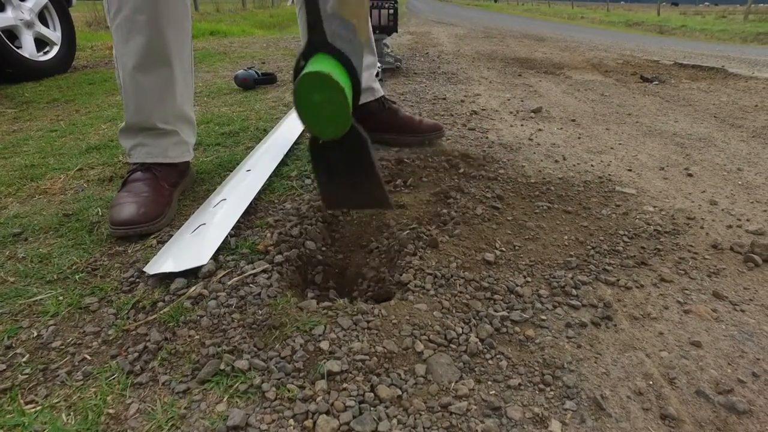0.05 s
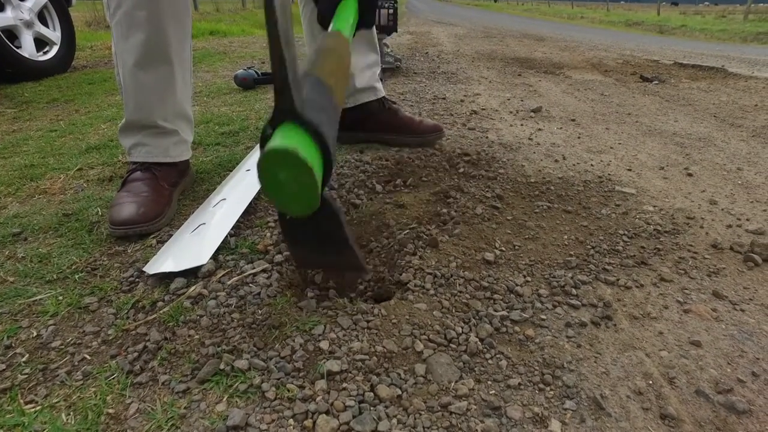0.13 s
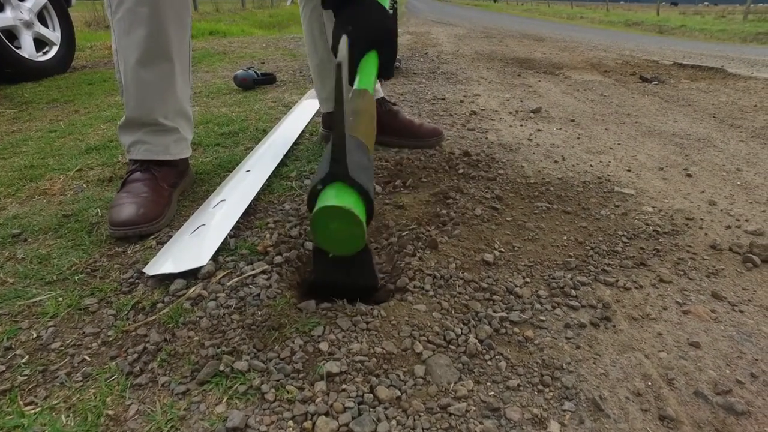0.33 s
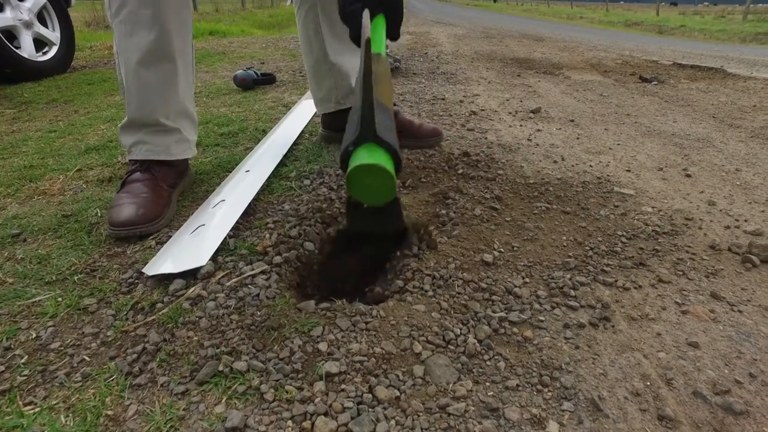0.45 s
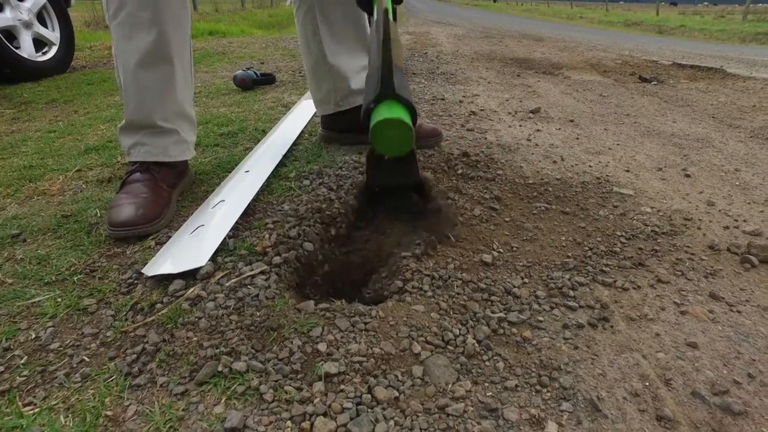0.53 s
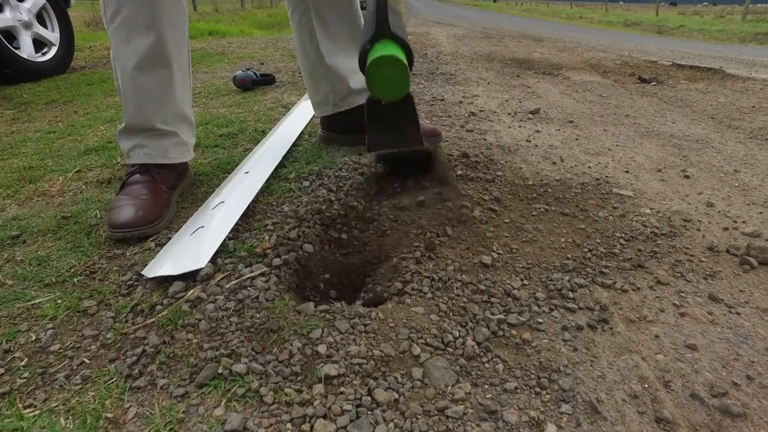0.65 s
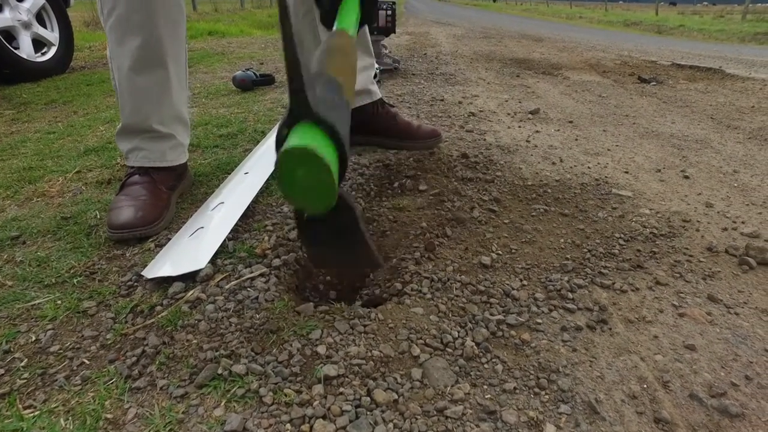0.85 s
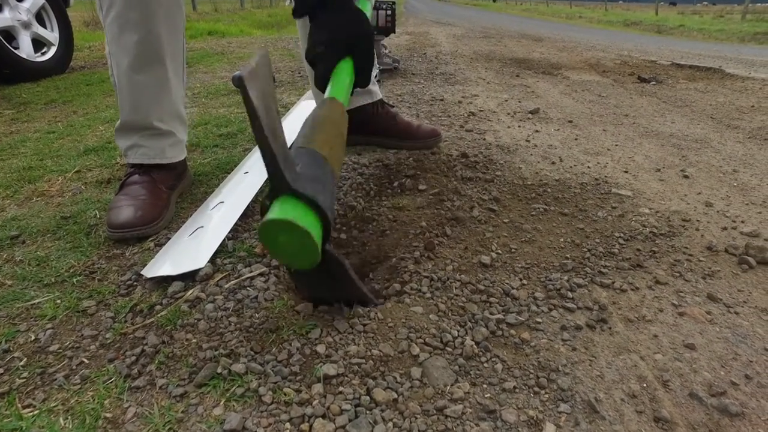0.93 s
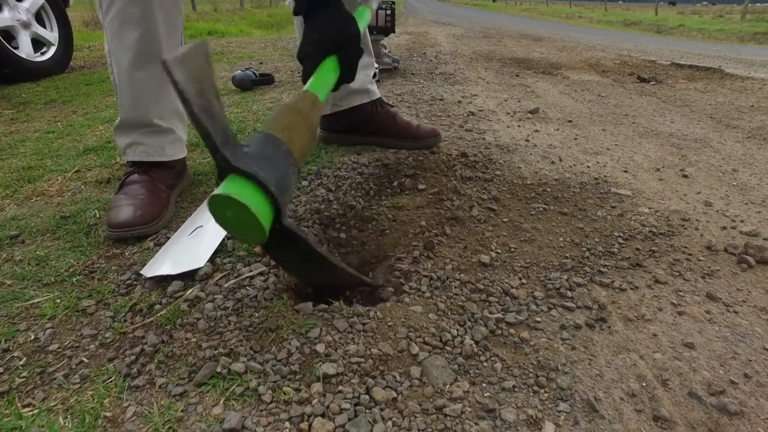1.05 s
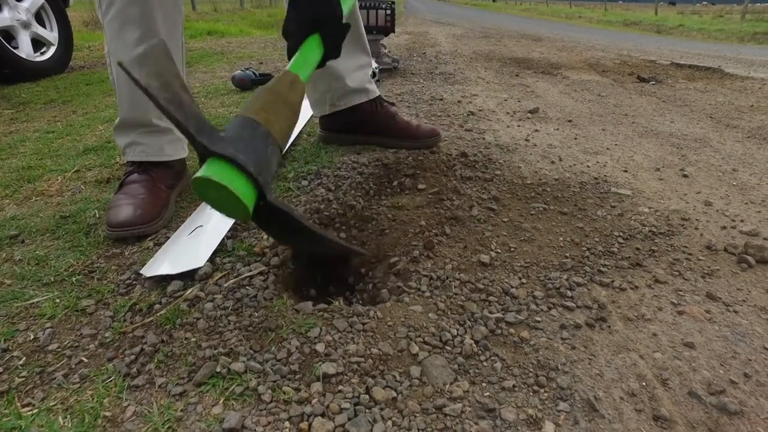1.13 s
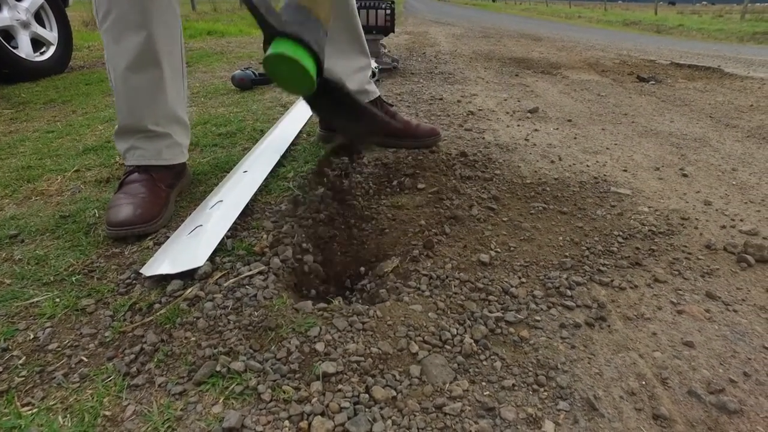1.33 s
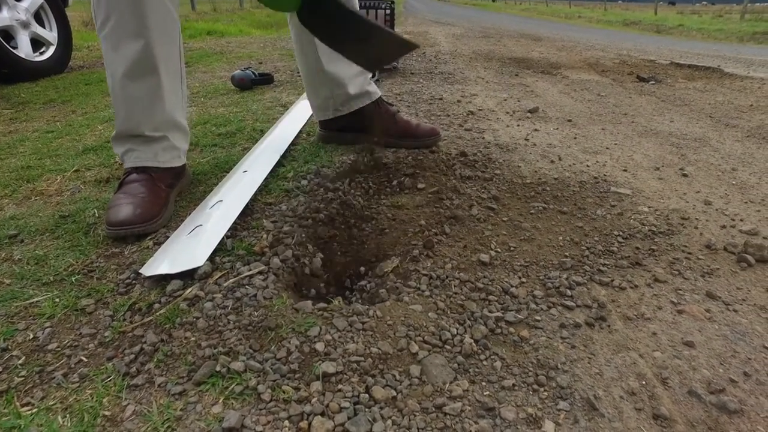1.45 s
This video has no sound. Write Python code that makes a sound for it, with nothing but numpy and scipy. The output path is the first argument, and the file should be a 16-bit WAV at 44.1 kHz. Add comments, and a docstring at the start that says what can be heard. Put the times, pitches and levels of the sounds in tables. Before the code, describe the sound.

A mattock chops into hard gravel close by, with a sharp crunch and thud at about 0.25 seconds. Stones grind and knock on the blade until 0.5, then grit patters down. A second, brighter chop lands at 0.95 seconds, followed by louder scraping and clacking. The steel rings briefly as it comes free around 1.1, and more grit falls until 1.5. Light wind rumbles on the microphone throughout.

```python
"""A sharp crunch of gravel, close by: a mattock (a heavy digging tool) chops twice into a hard roadside.
Each time the blade crushes in, thuds to a stop in packed earth and is levered out, so stones grind and
knock against the steel. The buried blade rings only briefly; it rings longer as it comes free at the end.
Thrown grit patters down after each blow, and light wind rumbles on the microphone."""
import sys
import numpy as np
from scipy import signal
from scipy.fft import rfft, irfft, next_fast_len
from scipy.io import wavfile
from scipy.ndimage import map_coordinates

SR = 44100
rng = np.random.default_rng(int(sys.argv[2]) if len(sys.argv) > 2 else 0)


def waveform_to_disk(signal):
    """Save audio, clipped to [-1, 1], as 16-bit WAV at the path in sys.argv[1]."""
    frames = np.transpose(np.atleast_2d(signal))
    scaled = np.clip(frames, -1, 1) * 32767
    samples = np.round(scaled).astype(np.int16)
    wavfile.write(sys.argv[1], SR, samples)


N = 66150

# Levels are relative. A fade_s is the time a sound takes to die away by 60 dB.
# The blade cutting in: start_s, hold_s, gravel_db, head_db, blade_db
BITES = [(0.2254, 0.025, -34, -34, -34.5), (0.9462, 0.0029, -22, -27.5, -19),
         (0.954, 0.0082, -32, -25, -78)]
# The blade packing the earth: start_s, hold_s, level_db
PACKS = [(.231, 0.018, -30), (0.2453, 0.0023, -19.5), (0.253, 0.0023, -32), (.958, 0.0127, -29)]
# The ground taking the weight: start_s, pitch_hz, level_db, fade_s
THUDS = [(.2468, 832, -3.5, 0.012), (.2472, 632, -15.5, 0.029), (.2478, 176, -18, 0.045),
         (.2515, 80.5, -21.5, 0.075), (.292, 160, -26.5, 0.031), (1.083, 217, -29, .04),
         (1.129, 95, -25, 0.082)]
# The steel edge glancing off a stone: start_s, pitch_hz, level_db, fade_s
CLINKS = [(.2366, 11900, -13.5, 0.003), (.2976, 1317, -26, 0.04), (.9472, 3700, -6.5, 0.014)]
# Grinding as the blade is levered out, one list for each pull: time_s, level_db
PULLS = [
    [(.262, -75), (.285, -51), (.325, -45), (.348, -52), (.39, -46.5), (.412, -41), (.432, -45),
     (.448, -55.5), (.48, -45), (.53, -59.5), (.56, -94)],
    [(.972, -43), (1.005, -71), (1.03, -38), (1.064, -58), (1.076, -36), (1.104, -41), (1.13, -37),
     (1.16, -41), (1.2, -36.5), (1.218, -72), (1.27, -61)],
]
# The tone of each pull: head_db, blade_db, treble_lift_db
PULL_TONES = [(-3.5, -10, -1), (-12, -5.5, 3)]
# Stones knocking on the blade: start_s, level_db, clunk_db, rough_pitch_hz
KNOCKS = [(0.2965, -37.5, -27.5, 2980), (0.316, -44, -35, 2490), (0.355, -43, -42.5, 9260),
          (0.377, -39, -50, 7860), (.413, -47.5, -51, 3500), (0.46, -52, -43, 2960),
          (0.4701, -42.5, -32, 2960), (1.021, -36, -40, 4160), (1.0325, -34.5, -38, 3580),
          (1.055, -42.5, -39.5, 4870), (1.077, -37, -34, 3620), (1.1172, -28.5, -34.5, 4220),
          (1.132, -30, -32, 4600), (1.14, -31, -51, 3900), (1.169, -32.5, -45, 4100), (1.2, -39, -39, 4040),
          (1.229, -37, -72, 3700)]
# Single bits of grit landing nearby: start_s, level_db
GRIT_TICKS = [(.5955, -38), (.630, -36), (.6505, -38), (.6585, -38), (.6975, -38), (.6992, -32),
              (.7212, -35), (.7487, -27), (.7635, -39), (.832, -41), (1.294, -42.5), (1.342, -35.5),
              (1.378, -35), (1.391, -33), (1.445, -40)]
# The shower of fine grit: time_s, level_db
GRIT_SHOWER = [(0, -50), (.1, -63), (.19, -68.5), (.5, -59.5), (.6, -61.5), (.655, -54), (.72, -63),
               (.77, -53.5), (.81, -66), (.9, -75), (1.26, -65), (1.35, -58), (1.42, -56), (1.45, -47.5),
               (1.5, -61)]
# Notes of the tool's head on its handle, when nothing muffles it: pitch_hz, level_db, fade_s
HEAD_NOTES = [(582, -8, 0.09), (900, 2, 0.063), (1246, 1, 0.08), (1850, -2.5, 0.032), (2124, -10.5, 0.11),
              (2420, -33, 0.12), (3070, -4, 0.062), (3138, 0, 0.093), (3320, -5.5, 0.059),
              (3270, -4, 0.037), (3930, -1.5, 0.089), (4720, -7.5, 0.016), (5955, 0.5, 0.037)]
# Notes of the free steel blade: pitch_hz, level_db, fade_s
BLADE_NOTES = [(2238, -2, .16), (3587, 1, .15), (4278, -3, .16), (4936, -7, .1), (5955, -7, .1),
               (6500, -2, .3), (6761, -6, .15), (8263, -4, .24), (8870, -3, .08), (9920, -10, .12),
               (11690, -14, .16), (12120, -8, .16), (13080, -13, .2), (13750, -12, .14), (14820, -13, .15)]
# The bright tone of crushed gravel: pitch_hz, level_db
CRUNCH_TONE = [(100, -10), (400, -2), (1000, -2.5), (2200, -1), (3800, 7), (6000, -1), (10000, -25),
               (14500, -46), (16000, -11)]
# The rough tone of gravel rubbing on steel: pitch_hz, level_db
GRIND_TONE = [(80, 7), (250, 2.5), (500, 5), (900, 2), (1600, -5.5), (2700, -0.5), (3700, 3), (5000, -8.5),
              (7500, -10), (10000, -33), (14500, -54), (16000, -61)]
# The dull tone of packed earth: pitch_hz, level_db
EARTH_TONE = [(50, -2), (180, -1.5), (450, -2), (800, -0.5), (1400, -4.5), (2400, -6), (5000, -26),
              (16000, -69)]
# The thin, high tone of falling grit: pitch_hz, level_db
GRIT_TONE = [(300, -24), (2200, -8.5), (5500, 2), (8500, -2.5), (11000, -3.5), (14500, -1.5), (16500, -1.5)]
# Wind rumble and outdoor hush: pitch_hz, level_db
WIND_TONE = [(12, 0.5), (30, 1.5), (60, -0.5), (110, -9), (200, -23), (450, -23), (1000, -30),
             (2200, -39.5), (3300, -35.5), (4300, -34), (5500, -49), (10000, -62), (16000, -65)]

FREE_AT_S, FREEING_S, FREE_BOOST_DB = 1.124, 0.0073, 6  # the blade leaves the earth
BURIED_FADE_SCALE = 0.15  # share of its ringing time that the buried blade keeps
CRUSH_SPREAD_DB, LOOSE_SPREAD_DB = 2, 4  # how much crushed and loose grains vary in strength


def chops():
    """The blade crushes gravel, rings briefly and is stopped by the earth."""
    bites = sum(amp(levels_db)[:, None] * burst(start_s, hold_s, fade_s=0.024, attack_s=0.0006)
                for start_s, hold_s, *levels_db in BITES)
    gravel_gain, head_gain, blade_gain = bites
    crunch = colour(gravel_gain * grains(14000, CRUSH_SPREAD_DB), CRUNCH_TONE)
    crush = grains(12000, CRUSH_SPREAD_DB)
    head = ring(head_gain * crush, HEAD_NOTES, fade_scale=0.7)
    blade = ring(blade_gain * crush, BLADE_NOTES, BURIED_FADE_SCALE)
    packing = sum(amp(db) * burst(start_s, hold_s, fade_s=0.015) for start_s, hold_s, db in PACKS)
    earth = colour(packing * grains(12000, CRUSH_SPREAD_DB), EARTH_TONE)
    thuds = pings(THUDS, attack_s=0.00084)
    clinks = pings(CLINKS, attack_s=0.00068)
    return crunch + head + blade + earth + thuds + clinks


def levering():
    """Gravel grinds along the steel as it is pulled out; once free, the blade rings on."""
    out = np.zeros(N)
    free = (1 + np.tanh((clock() - FREE_AT_S) / FREEING_S)) / 2  # 0 buried, 1 free
    for points, (head_db, blade_db, lift_db) in zip(PULLS, PULL_TONES):
        rub = level(points) * slips() * grains(3000, LOOSE_SPREAD_DB)
        grind = colour(rub, GRIND_TONE, lift_db)
        blade = ring(rub * (1 - free), BLADE_NOTES, BURIED_FADE_SCALE)
        blade += amp(FREE_BOOST_DB) * ring(rub * free, BLADE_NOTES)
        out += grind + amp(head_db) * ring(rub, HEAD_NOTES) + amp(blade_db) * blade
    return out


def slips(changes_per_s=130, spread_db=3.5):
    """Gravel catches and slips, so the grinding flickers in loudness."""
    steps = np.clip(rng.standard_normal(int(N * changes_per_s / SR) + 4), -2, 2)
    flicker = map_coordinates(steps, [clock() * changes_per_s])  # glide from step to step
    return unit(amp(spread_db * flicker))


def knocks():
    """Larger stones slip and knock against the steel, each with a short clack of its own."""
    hits, clunks, clacks = np.zeros((3, N))
    for start_s, level_db, clunk_db, rough_pitch_hz in KNOCKS:
        shape = burst(start_s, hold_s=0.0012, fade_s=0.024, attack_s=0.00017)
        hit = amp(level_db) * shape * grains(9700, CRUSH_SPREAD_DB)
        pitches_hz = rough_pitch_hz * np.exp(0.2 * rng.uniform(-2.05, 1.5, size=6))
        clacks += ring(hit, [(hz, 0, 0.028) for hz in pitches_hz])  # six equally strong, short notes
        hits += hit
        clunks += amp(clunk_db) * shape
    crunch = amp(-11) * colour(hits, CRUNCH_TONE)
    head = amp(-4) * ring(hits, HEAD_NOTES, fade_scale=0.6)
    blade = amp(-8) * ring(hits, BLADE_NOTES, BURIED_FADE_SCALE)
    earth = colour(clunks * grains(6000, LOOSE_SPREAD_DB), EARTH_TONE)
    return crunch + amp(-5) * clacks + head + blade + earth


def grit():
    """Thrown grit lands in a fine shower with single sharp ticks."""
    ticks = np.zeros(N)
    for start_s, level_db in GRIT_TICKS:
        snap = burst(start_s, hold_s=0.0002, fade_s=0.0025, attack_s=0.00005)
        tail = amp(-17) * burst(start_s, hold_s=0, fade_s=0.03)
        ticks += amp(level_db) * (snap + tail)
    coarse = grains(400, LOOSE_SPREAD_DB)
    fine = amp(-5) * grains(6000, LOOSE_SPREAD_DB)
    shower = level(GRIT_SHOWER) * (coarse + fine)
    return colour(ticks * rng.standard_normal(N) + shower, GRIT_TONE)


def ground_echo(sound):
    """The ground scatters back a weak, short echo."""
    echo_shape = burst(start_s=0.005, hold_s=0, fade_s=0.095)
    return amp(-21) * through(sound, rng.standard_normal(N) * echo_shape)


def wind():
    """Light wind rumbles on the microphone over a far outdoor hush."""
    return amp(-45.5) * unit(colour(rng.standard_normal(N), WIND_TONE))


def grains(per_s, spread_db):
    """Tiny clicks of uneven strength at random moments, like small stones touching."""
    sizes = amp(spread_db * np.clip(rng.standard_normal(N), -2, 2))
    signs = rng.choice([-1, 1], N)
    touching = rng.random(N) < per_s / SR
    return unit(sizes * signs * touching)


def ring(push, notes, fade_scale=1):
    """An object rings at its own notes, as strongly as it is pushed; fade_scale below 1 shortens them."""
    out = np.zeros(N)
    for pitch_hz, level_db, fade_s in notes:
        decay = np.exp(-np.log(1000) / (fade_s * fade_scale * SR))
        feedback = [1, -2 * decay * np.cos(2 * np.pi * pitch_hz / SR), decay * decay]
        out += amp(level_db) * unit(signal.lfilter([1, 0, -1], feedback, push))
    return unit(out) * np.sqrt(np.mean(push ** 2))


def pings(rows, attack_s):
    """One fading pure tone for each row."""
    out = np.zeros(N)
    for start_s, pitch_hz, level_db, fade_s in rows:
        tone = np.sin(2 * np.pi * pitch_hz * (clock() - start_s))
        out += amp(level_db) * burst(start_s, 0, fade_s, attack_s) * tone
    return out


def burst(start_s, hold_s, fade_s, attack_s=0.00086):
    """A loudness shape that rises quickly, holds, then dies away."""
    age_s = np.maximum(clock() - start_s, 0)
    rise = 1 - np.exp(-age_s / attack_s)
    return rise * amp(-60 * np.maximum(age_s - hold_s, 0) / fade_s)


def level(points):
    """A loudness shape that joins the points and is silent outside them."""
    time_s, level_db = np.transpose(points)
    return amp(np.interp(clock(), time_s, level_db, left=-120, right=-120))


def colour(sound, tone, lift_db=0, size=8192):
    """Shape a sound's lows and highs with a tone table; lift_db turns the treble up or down."""
    pitch_hz, level_db = np.transpose(tone)
    hz = np.fft.rfftfreq(size, 1 / SR)
    curve_db = np.interp(np.log(hz + 1), np.log(pitch_hz), level_db)
    curve_db += lift_db * hz ** 2 / (hz ** 2 + 3500 ** 2)
    # Build the filter so that nothing sounds ahead of a hit (minimum phase).
    cepstrum = irfft(np.log(amp(curve_db)))
    cepstrum[1:size // 2] *= 2
    cepstrum[size // 2 + 1:] = 0
    return through(sound, irfft(np.exp(rfft(cepstrum))))


def through(sound, response):
    """Filter a sound, given the filter's response to one click (scaled to energy 1)."""
    return signal.fftconvolve(sound, response / np.linalg.norm(response))[:N]


def amp(db):
    """Turn decibels into a number to multiply by."""
    return 10 ** (np.asarray(db) / 20)


def unit(sound):
    """Scale to an average strength (rms) of 1."""
    return sound / np.sqrt(np.mean(sound ** 2) + 1e-20)


def clock():
    """The time of every sample, in seconds."""
    return np.arange(N) / SR


def scene():
    """The digging, its faint echo and the wind, in one channel."""
    digging = chops() + levering() + knocks() + grit()
    return (digging + ground_echo(digging) + wind())[None]


def record(dry):
    """The very highest treble falls away steeply to nothing."""
    roll_off_hz, top_hz = 15200, 16600
    size = next_fast_len(N + SR // 2)
    hz = np.fft.rfftfreq(size, 1 / SR)
    gain = np.clip((top_hz - hz) / (top_hz - roll_off_hz), 0, 1) ** 2
    return irfft(rfft(dry, size) * gain, size)[..., :N]


dry = scene()
out = record(dry)
waveform_to_disk(out)
```